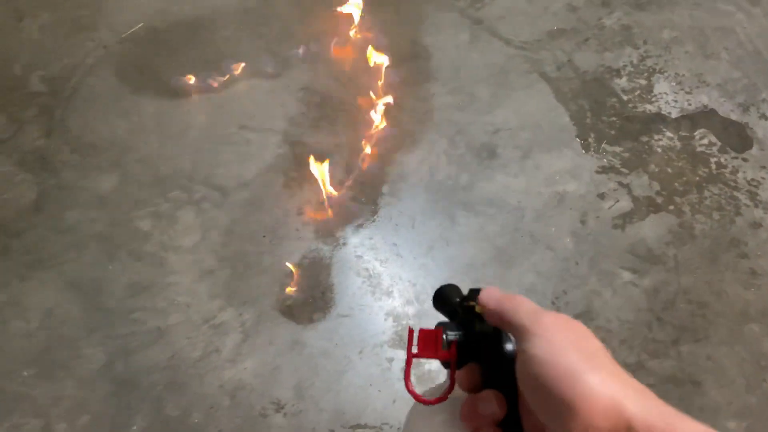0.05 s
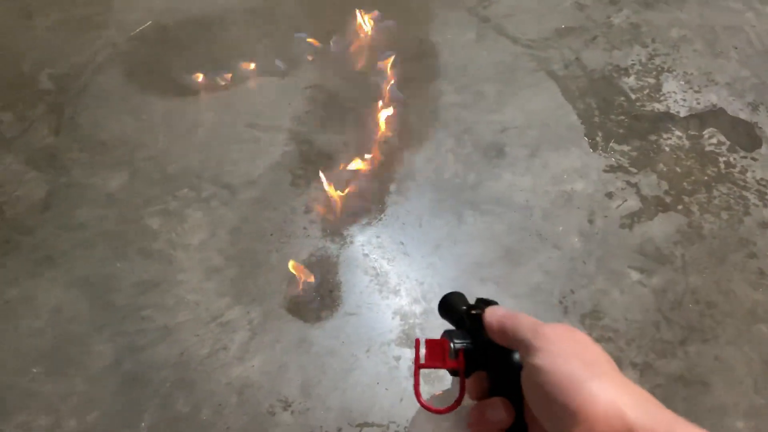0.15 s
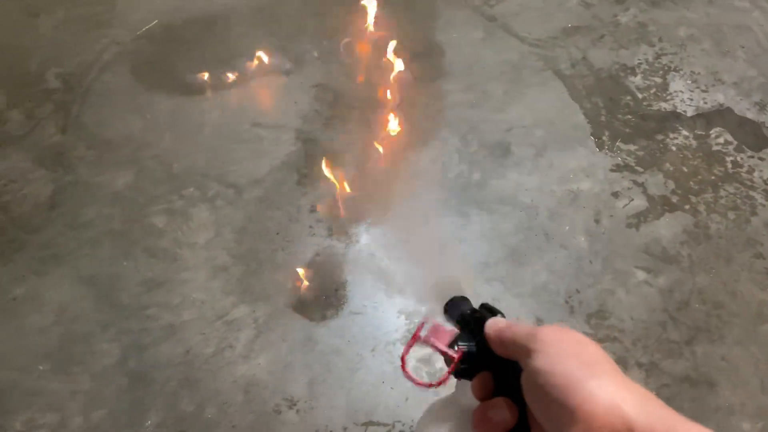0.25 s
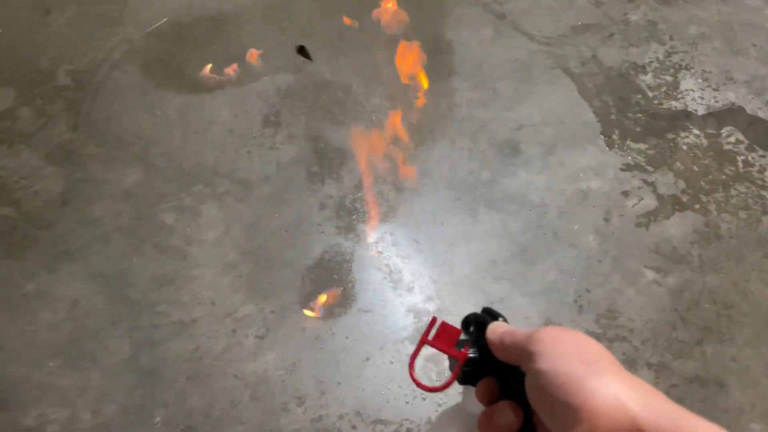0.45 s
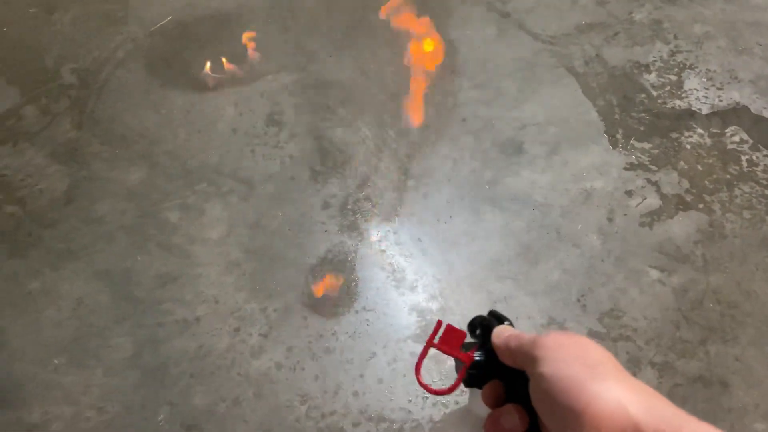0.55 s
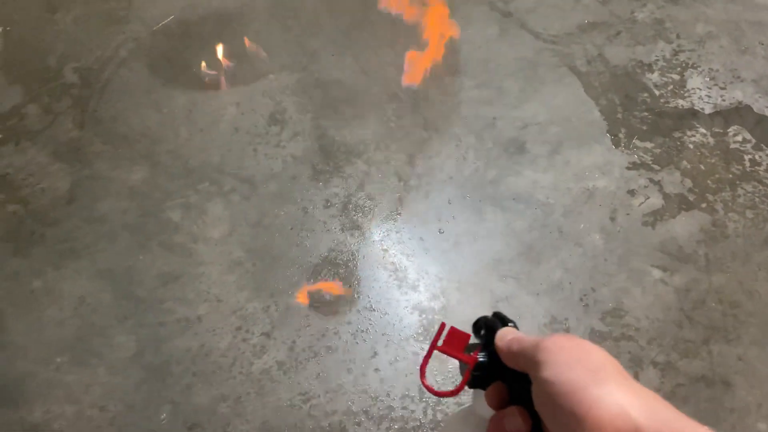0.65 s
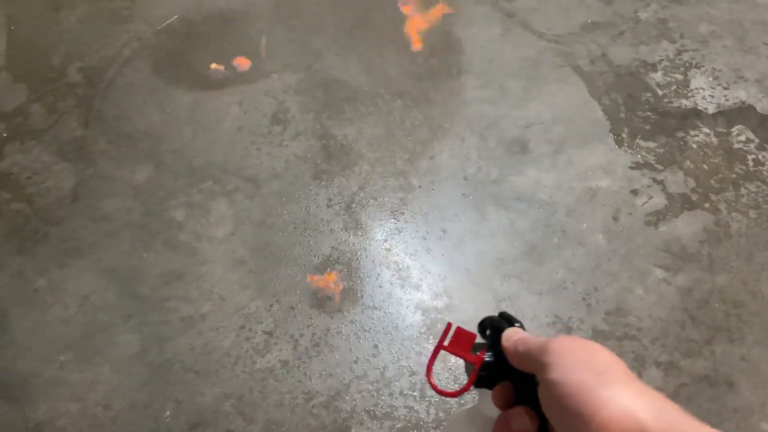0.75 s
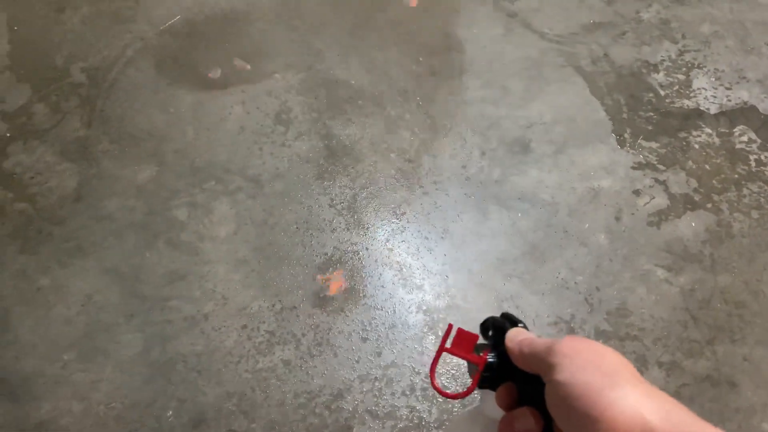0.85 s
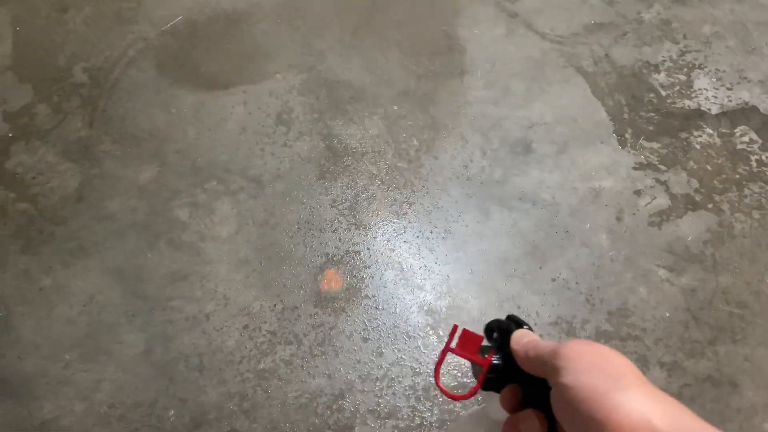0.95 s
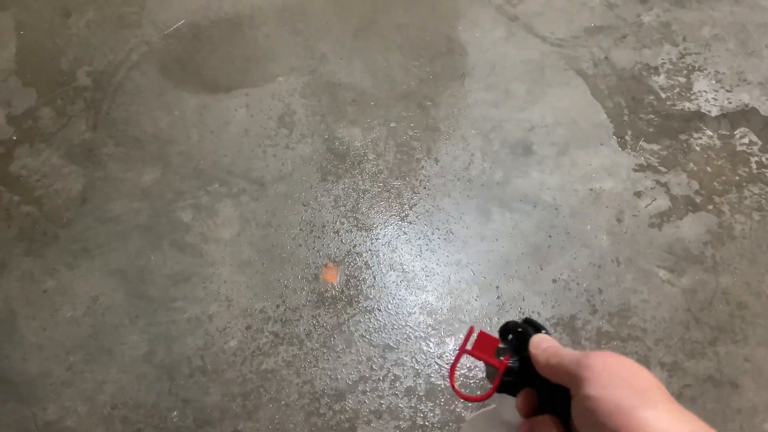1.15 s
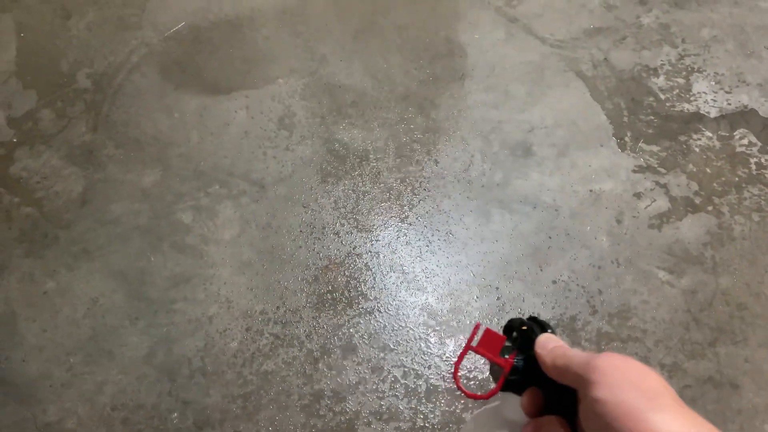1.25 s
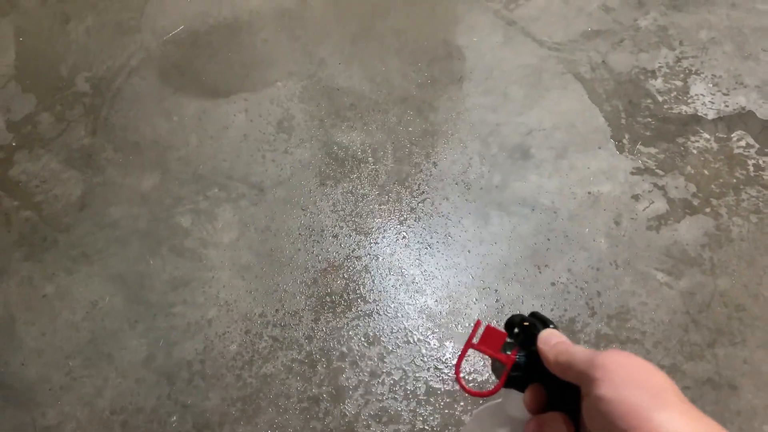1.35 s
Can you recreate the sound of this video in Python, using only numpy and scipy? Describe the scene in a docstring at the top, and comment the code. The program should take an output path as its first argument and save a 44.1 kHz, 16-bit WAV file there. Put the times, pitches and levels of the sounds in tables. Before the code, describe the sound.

A water extinguisher sprays with a sudden, sputtering hiss that fades as drops patter on concrete.

```python
"""A thin hiss leaks from the valve of a water extinguisher, over a low rumble of air on the microphone.
The valve opens with a sharp rush that rings the nozzle, then sinks into a duller, sputtering spray
as the pressure falls. Aimed at small flames on a concrete floor, the water patters down in drops.
A dull thump sounds midway, and the hard room echoes."""
import sys
import numpy as np
from scipy import signal
from scipy.fft import rfft, irfft
from scipy.io import wavfile

SR = 44100
rng = np.random.default_rng(int(sys.argv[2]) if len(sys.argv) > 2 else 0)


def unload_wav(signal):
    """Save mono or channel-first audio to the path in sys.argv[1] as 16-bit WAV at rate SR, clipped to [-1, 1]."""
    wavfile.write(
        sys.argv[1],
        SR,
        np.round(np.clip(np.atleast_2d(signal).T, -1, 1) * 32767).astype(np.int16),
    )


N = 61739
T = np.arange(N) / SR
OPEN_S, OPEN_RISE_S = 0.2452, 0.0032  # valve opening


def undb(db):
    """Decibels to gain."""
    return 10 ** (np.asarray(db) / 20)


def unit(x):
    """Scale to rms 1."""
    return x / np.sqrt(np.mean(x ** 2))


def noise():
    """White Gaussian noise."""
    return rng.standard_normal(N)


def colour(x, spectrum):
    """Minimum-phase filter through (freq_hz, relative_db) points; output rms 1."""
    hz, db = np.array(spectrum, float).T
    bins_hz = np.maximum(np.arange(N + 1) * SR / (2 * N), 1)
    gain = undb(np.interp(np.log(bins_hz), np.log(hz), db))
    cepstrum = irfft(np.log(gain))
    cepstrum[1:N] *= 2
    cepstrum[N + 1:] = 0
    response = np.exp(rfft(cepstrum))
    return unit(irfft(rfft(x, 2 * N) * response)[:N])


def ring(x, hz, width_hz):
    """One resonance, gain 1 at its centre."""
    return signal.lfilter(*signal.iirpeak(hz, hz / width_hz, fs=SR), x)


def band(x, hz, width_hz):
    """Steep band-pass around a centre."""
    edges_hz = [hz - width_hz / 2, hz + width_hz / 2]
    return signal.sosfilt(signal.butter(4, edges_hz, "band", fs=SR, output="sos"), x)


def wander(rate_hz):
    """Straight lines between random values; spread near 1."""
    knots = rng.standard_normal(N // 10)
    return np.interp(T * rate_hz, np.arange(len(knots)), knots)


def envelope(start_s, rise_s, hold_s=0, fall_db_s=0):
    """Linear rise, hold, then an even fall in dB."""
    rise = np.clip((T - start_s) / rise_s, 0, 1)
    return rise * undb(-fall_db_s * np.maximum(T - start_s - hold_s, 0))


def jet(sputter_db, sputter_hz):
    """Turbulence that sputters as water and air alternate in the nozzle."""
    return noise() * undb(sputter_db * wander(sputter_hz) + 0.93 * wander(rate_hz=39.8))


def drops(per_s, spread_db):
    """Random impacts of uneven size; rms 1."""
    hits = rng.random(N) < per_s / SR
    size = undb(spread_db * np.clip(noise(), -2, 2))
    return unit(hits * size * np.sign(noise()))


# Draught spectrum: freq_hz, relative_db
DRAUGHT_SPECTRUM = [(5, -6), (14, 3), (28, -13), (60, -25), (110, -33), (300, -60), (2000, -96)]
# Draught strength: time_s, level_db
DRAUGHT_CURVE = [(0, -46.5), (.35, -51), (.8, -53), (1.1, -42.5), (1.4, -45.5)]
# Room tone spectrum: freq_hz, relative_db
ROOM_TONE_SPECTRUM = [(30, -7), (60, 4), (100, -10), (300, -15.5), (800, -25.5), (1900, -27), (3500, -35.5),
                      (6300, -36), (10000, -50.5), (16000, -41)]
def air():
    """Quiet room tone and a draught rumbling on the microphone, strongest late on."""
    draught_db = np.interp(T, *np.array(DRAUGHT_CURVE).T)
    draught = undb(draught_db) * colour(noise(), DRAUGHT_SPECTRUM)
    return draught + undb(-58) * colour(noise(), ROOM_TONE_SPECTRUM)


# Leak spectrum: freq_hz, relative_db
LEAK_SPECTRUM = [(100, -15), (400, -21), (1100, -21), (3100, -20), (4000, -3.5), (4800, 3), (6200, -21),
                 (7700, -4), (9000, -21.5), (16000, -17)]
def leak():
    """A thin hiss while the valve is barely open."""
    fade_out = np.clip((OPEN_S + 0.0085 - T) / 0.01, 0, 1)
    hiss = colour(jet(sputter_db=0.82, sputter_hz=535), LEAK_SPECTRUM)
    return undb(-36) * hiss * envelope(start_s=0.2, rise_s=0.031) * fade_out


# Faint lever click, then short spits, splats and taps: start_s, level_db, centre_hz, width_hz, decay_s
TICK_EVENTS = [(0.2018, -54, 1300, 1000, 0.004), (0.246, -13, 6400, 5900, 0.00067),
               (0.286, -21, 1897, 800, 0.0067), (0.4704, -29, 5240, 4000, 0.00062),
               (0.51, -34, 10900, 4500, .002), (.5135, -31, 10700, 4500, 0.0028),
               (.728, -22, 1100, 700, .005), (0.7335, -18.5, 4070, 1400, 0.0034),
               (0.742, -18.5, 2837, 1400, 0.0018), (1.021, -36, 324, 300, 0.0032),
               (1.055, -31, 2150, 500, 0.005), (1.1265, -32, 4030, 4000, 0.0017),
               (1.137, -27, 2740, 2000, 0.0016), (1.355, -35, 1770, 700, 0.0013)]
def ticks():
    """A faint lever click, then short spits, splats and taps; each a fast-decaying band of noise."""
    out = np.zeros(N)
    for start_s, level_db, centre_hz, width_hz, decay_s in TICK_EVENTS:
        decay = (T >= start_s) * np.exp(-np.maximum(T - start_s, 0) / decay_s)
        tick = band(noise() * decay, centre_hz, width_hz)
        tick_rms = np.sqrt(np.sum(tick ** 2) / (decay_s * SR))
        out += undb(level_db) * tick / tick_rms
    return out


# Nozzle resonances: pitch_hz, width_hz, relative_db
NOZZLE_MODES = [(4440, 110, -8), (5260, 90, -5), (5300, 110, -25), (6080, 31, 3.5), (6320, 40, 4),
                (8380, 17, -4), (9650, 28, -5), (11600, 160, -26)]
# Opening rush spectrum: freq_hz, relative_db
RUSH_SPECTRUM = [(150, -24), (300, -15.5), (1400, -20), (2800, -15.5), (4200, -3), (5400, 2.5), (6200, -4),
                 (7200, -9.5), (10000, -22.5), (16000, -21.5)]
# Finest mist spectrum: freq_hz, relative_db
MIST_SPECTRUM = [(1000, -22.5), (4000, -3.5), (6000, -14), (8300, 6), (9200, 2.5), (12300, 0.5),
                 (13500, -5), (16000, -27)]
def burst():
    """The valve opens: a bright rush rings the nozzle, with a fizz of mist."""
    rush = undb(-11) * colour(jet(sputter_db=0.53, sputter_hz=900), RUSH_SPECTRUM)
    modes = sum(undb(db) * unit(ring(noise(), hz, width_hz)) for hz, width_hz, db in NOZZLE_MODES)
    whistle = undb(-17) * unit(modes)
    mist = undb(-15.5) * colour(jet(sputter_db=0.92, sputter_hz=900), MIST_SPECTRUM)
    mist *= envelope(OPEN_S, OPEN_RISE_S, hold_s=0.033, fall_db_s=126)
    return (rush + whistle) * envelope(OPEN_S, OPEN_RISE_S, hold_s=0.061, fall_db_s=105) + mist


# Spray spectrum: freq_hz, relative_db
SPRAY_SPECTRUM = [(80, -26.5), (220, -15), (500, -18), (1300, -11), (2800, -12), (4300, 1.5), (5600, 2),
                  (6500, -2.5), (7600, -7.5), (10500, -13.5), (13000, -19), (16000, -31)]
def spray():
    """Sputtering hiss that sinks with the pressure."""
    hiss = colour(jet(sputter_db=1.7, sputter_hz=900), SPRAY_SPECTRUM)
    return undb(-20) * hiss * envelope(OPEN_S, OPEN_RISE_S, fall_db_s=18)


def bore():
    """The jet excites the hollow tone of the outlet."""
    tone = jet(sputter_db=2.0, sputter_hz=300)
    for _ in range(2):
        tone = ring(tone, hz=2015, width_hz=570)
    return undb(-33) * unit(tone) * envelope(OPEN_S, OPEN_RISE_S, fall_db_s=11)


# Air pushes as the jet starts: start_s, level_db, rise_s
AIR_PUFFS = [(0.2461, -21, 0.0013), (0.286, -25.5, 0.0018)]
def puffs(low_cut_hz=45.3):
    """Short pushes of air ahead of the water, heard as low pops."""
    out = np.zeros(N)
    for start_s, level_db, rise_s in AIR_PUFFS:
        progress = np.maximum(T - start_s, 0) / rise_s
        out += undb(level_db) * progress * np.exp(1 - progress)
    return signal.lfilter(*signal.butter(1, low_cut_hz, "high", fs=SR), out)


# Drop impact spectrum: freq_hz, relative_db
PATTER_SPECTRUM = [(120, -14), (220, -8.5), (430, -1.5), (800, -6), (1400, -7.5), (2100, -1.5), (2600, -1),
                   (3600, 3.5), (5000, 2.5), (6500, -2), (8000, -6.5), (11000, -9.5), (16000, -22)]
def patter(flight_s=0.055):
    """Drops land on the concrete after a short flight."""
    impacts = colour(drops(per_s=4000, spread_db=2), PATTER_SPECTRUM)
    return undb(-29) * impacts * envelope(OPEN_S + flight_s, rise_s=0.054, fall_db_s=4)


# Flow swells and sags: centre_s, change_db, half_width_s
FLOW_SURGES = [(0.554, 1.5, 0.031), (1.142, 0, 0.056), (1.255, -1.5, 0.02), (1.335, 2, 0.02)]
def flow_gain(dwindle_s=1.146, fall_db_s=28):
    """The flow swells and sags, and dwindles faster near the end."""
    surge_db = sum(db * np.exp(-((T - at_s) / half_s) ** 2) for at_s, db, half_s in FLOW_SURGES)
    return undb(surge_db - fall_db_s * np.maximum(T - dwindle_s, 0))


# Boom spectrum: freq_hz, relative_db
BOOM_SPECTRUM = [(60, -35), (145, -23), (195, 4), (350, -0.5), (600, -7), (850, -11.5), (1200, -5),
                 (1800, -11), (5000, -39)]
# Splash spectrum: freq_hz, relative_db
SPLASH_SPECTRUM = [(300, -5.5), (1100, -2.5), (1900, -13), (3200, 9.5), (4400, 4.5), (6000, -9),
                   (9000, -38), (16000, -38)]
def thump(start_s=0.7228, swing_hz=445, swing_low_cut_hz=220, splash_lag_s=0.0045):
    """A dull thump: one pressure swing, a fluttering boom and a short splashy crackle."""
    age_s = np.maximum(T - start_s, 0)
    swing = -0.25 * np.sin(2 * np.pi * swing_hz * age_s) * (age_s < 1 / swing_hz)
    swing = signal.lfilter(*signal.butter(2, swing_low_cut_hz, "high", fs=SR), swing)
    boom = undb(-27) * colour(jet(sputter_db=1.7, sputter_hz=150), BOOM_SPECTRUM)
    boom *= envelope(start_s, rise_s=0.0019, hold_s=0.033, fall_db_s=146)
    splash = undb(-23) * colour(drops(per_s=7200, spread_db=2.5), SPLASH_SPECTRUM)
    splash *= envelope(start_s + splash_lag_s, rise_s=0.0028, hold_s=0.011, fall_db_s=119)
    return swing + boom + splash


def room(x, echo_db=-7.5, gap_s=0.007):
    """Diffuse echo of hard walls; the treble dies first and the deep bass stays dry."""
    low_cut_hz, split_hz = 154, 4030
    mid_t60_s, treble_t60_s = 0.92, 0.49
    mid = signal.sosfilt(signal.butter(2, [low_cut_hz, split_hz], "band", fs=SR, output="sos"), noise())
    treble = signal.lfilter(*signal.butter(2, split_hz, "high", fs=SR), noise())
    tail = mid * undb(-60 * T / mid_t60_s) + treble * undb(-60 * T / treble_t60_s)
    tail *= T > gap_s
    return x + undb(echo_db) * signal.fftconvolve(x, tail / np.linalg.norm(tail))[:N]


def scene():
    """Extinguisher and thump in the echoing room, over dry air noise; mono."""
    opening = leak() + puffs() + burst()
    water = (spray() + bore() + patter()) * flow_gain()
    return (room(opening + water + thump() + ticks()) + air())[None]


def record(dry, top_hz=15800):
    """Clip at full scale, then low-pass steeply."""
    low_pass = signal.ellip(10, 0.2, 70, top_hz, fs=SR, output="sos")
    return signal.sosfilt(low_pass, np.clip(dry, -1, 1))


dry = scene()
out = record(dry)
unload_wav(out)
```